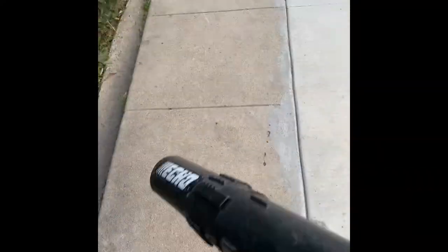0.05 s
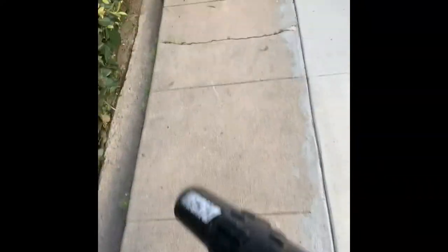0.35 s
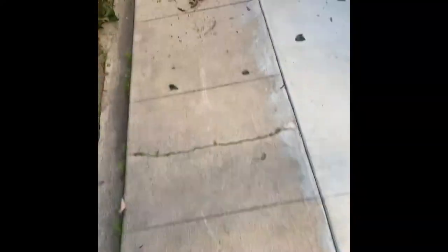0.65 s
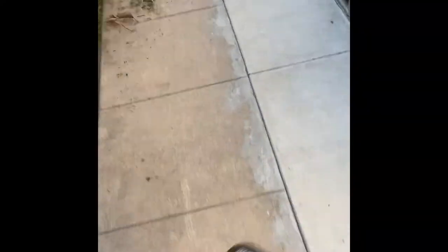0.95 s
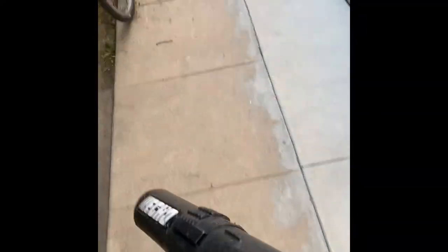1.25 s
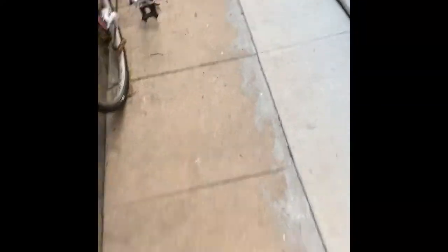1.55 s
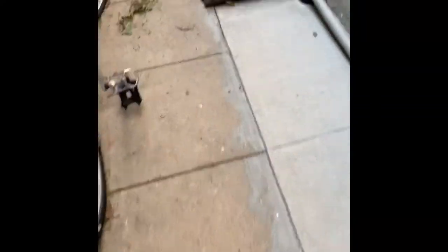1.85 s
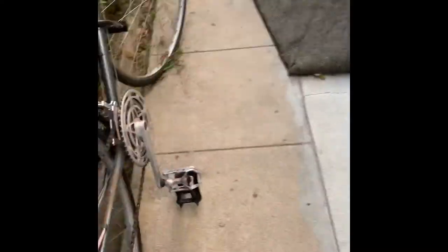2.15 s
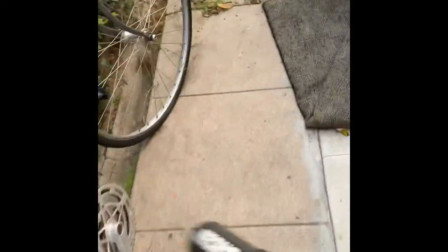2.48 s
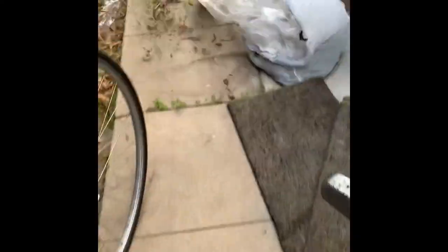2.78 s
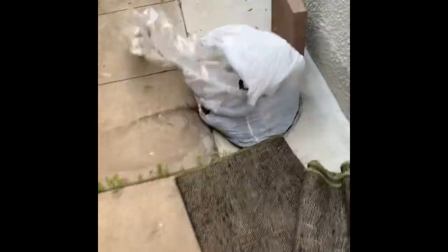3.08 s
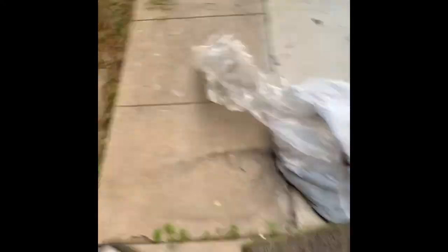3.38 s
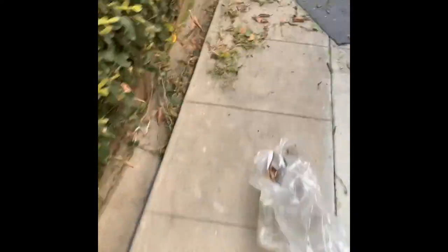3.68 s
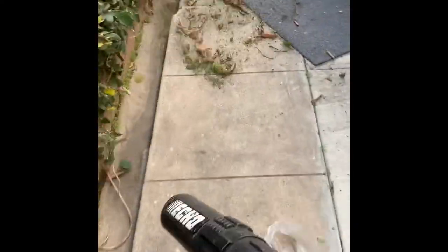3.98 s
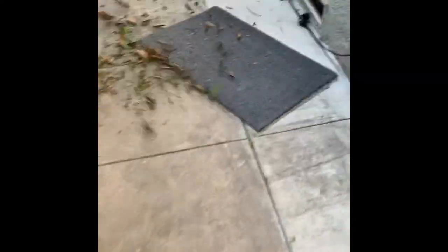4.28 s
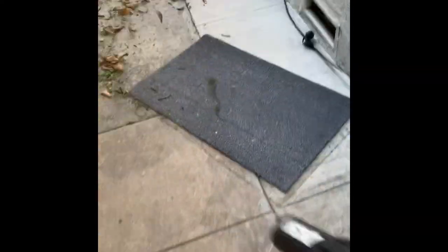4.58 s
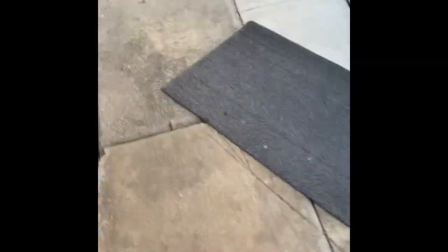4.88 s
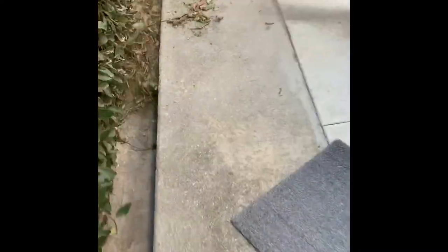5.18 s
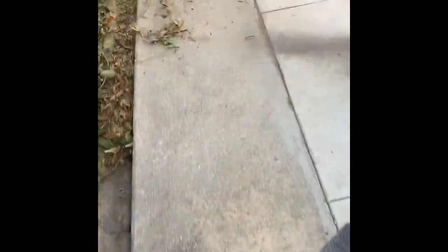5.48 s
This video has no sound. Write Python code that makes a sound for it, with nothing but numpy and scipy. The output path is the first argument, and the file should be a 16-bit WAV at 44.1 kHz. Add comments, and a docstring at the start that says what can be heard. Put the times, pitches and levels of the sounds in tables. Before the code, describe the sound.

A two-stroke petrol leaf blower runs at full throttle for the whole five and a half seconds, heard from just above as it is carried along an outdoor concrete path. The engine holds a steady, raspy drone under a fluttering fan whine, its tones swelling and fading slightly. Air roars and faintly hoots in the tube, rushes from the nozzle with brief high whistles, and hisses over the paving. Grit swishes at about 0.6 and 1.6 seconds. From 2.1 to 2.6 seconds dry leaves scurry in crackling bursts and harder bits snap sharply. More leaves skitter at around 3.1 to 3.3 seconds, amid short sputters of air. A few ticks near 3.8 seconds lead to the hardest strike, a quick clatter with a hollow knock, at about 4.1 seconds. The blower then keeps running unchanged to the end.

```python
"""A concrete path, where a two-stroke leaf blower is walked along at full throttle, heard from just above.
The exhaust drones and the fan whines, each partial swelling and fading on its own.
Turbulent air roars and hoots in the tube, rushes and whistles out of the nozzle and hisses
over the paving. Grit swishes, dry leaves scurry off in gusts and harder bits snap and knock."""
import sys
import numpy as np
from scipy import signal
from scipy.fft import rfft, irfft, next_fast_len
from scipy.io import wavfile
from scipy.ndimage import uniform_filter1d, map_coordinates

SR = 44100
rng = np.random.default_rng(int(sys.argv[2]) if len(sys.argv) > 2 else 0)


def pcm_store(signal):
    """Save signal as 16-bit PCM."""
    levels = np.round(np.clip(np.atleast_2d(signal), -1, 1) * 32767)
    wavfile.write(sys.argv[1], SR, levels.astype(np.int16).T)


N = 243873
TIME = np.arange(N) / SR
BIN_HZ = np.maximum(np.arange(N // 2 + 1) * SR / N, 1)

# engine speed, sagging a little under load (time [s], shaft rate [Hz])
SHAFT_SPEED = [(0, 160.7), (0.5, 161.6), (0.8, 161), (1.8, 160.6), (2.05, 161.4), (2.65, 161.1),
               (3.0, 159.8), (3.35, 160.8), (3.58, 160.2), (4.22, 161.6), (4.9, 161.3), (5.1, 160.8),
               (5.53, 160.9)]
# firing note, louder as the muffler turns towards the listener (time [s], level [dB])
FIRING_NOTE = [(0.02, -33.5), (0.55, -41), (0.58, -49), (1.01, -34), (1.59, -26), (3.06, -31),
               (3.56, -26.5), (4.05, -26.5), (4.13, -31), (5.48, -30.5)]
# body of the drone (multiple [x shaft rate], resting level [dB])
DRONE = [(2, -39), (3, -34.5), (4, -33.5), (5, -36.5), (6, -33.5), (7, -36.5), (8, -38.5), (9, -52)]
# rasp on top of it (multiple [x shaft rate], level [dB])
RASP = [(10, -44.5), (11, -41), (13, -44), (14, -52), (15, -51), (16, -47), (17, -44), (19, -47.5),
        (20, -53), (21, -52), (23, -53)]
# one partial swells or sinks (start [s], end [s], multiple [x shaft rate], held level [dB])
PARTIAL_SWELLS = [(0.106, .5, 2, -37.5), (0.528, 0.922, 2, -34), (1.762, 1.92, 2, -59),
                  (1.95, 2.55, 2, -37.5), (3.08, 3.5, 2, -39), (2.615, 3.05, 2, -47.5),
                  (4.12, 4.877, 2, -35.5), (-.1, 0.073, 4, -28), (0.105, 0.31, 4, -49),
                  (0.367, 0.713, 4, -30), (0.764, 0.942, 4, -53), (1.59, 2.255, 4, -29.5),
                  (2.604, 3.117, 4, -28), (3.32, 3.468, 4, -51), (3.49, 3.715, 4, -30),
                  (3.967, 4.507, 4, -29), (4.974, 5.403, 4, -27.5), (0.098, .47, 6, -29.5),
                  (0.762, 1.137, 6, -43), (1.186, 1.35, 6, -27.5), (1.72, 1.9, 6, -40),
                  (1.928, 2.614, 6, -27), (2.697, 3.037, 6, -22.5), (3.215, 3.31, 6, -25),
                  (3.396, 3.56, 6, -24), (3.965, 4.056, 6, -39), (4.12, 4.17, 6, -21.5),
                  (4.22, 4.3, 6, -24.5), (4.338, 4.43, 6, -19), (4.463, 4.533, 6, -27),
                  (4.55, 4.62, 6, -46), (4.647, 4.96, 6, -30.5), (4.98, 5.067, 6, -45),
                  (-.1, 0.255, 7, -30.5), (0.297, .45, 7, -50), (0.508, 0.642, 7, -23.5),
                  (1.185, 1.42, 7, -55), (2.278, 2.702, 7, -25.5), (3.664, 4.052, 7, -55),
                  (4.07, 4.15, 7, -31), (4.453, 4.708, 7, -31.5), (4.91, 5.25, 7, -31.5),
                  (.52, 1.0, 8, -33.5), (1.27, 1.785, 8, -31), (1.924, 2.14, 8, -27.5), (2.55, 3.1, 8, -52),
                  (4.035, 4.14, 8, -29.5), (4.432, 4.94, 8, -34.5), (4.984, 5.33, 8, -56),
                  (.12, .48, 8, -43), (3.15, 3.798, 8, -34), (3.87, 3.992, 8, -45), (4.22, 4.39, 8, -50),
                  (-.1, 0.632, 3, -40), (4.01, 4.45, 3, -32.5), (1.144, 1.45, 4, -38),
                  (1.413, 1.66, 6, -29.5), (1.95, 2.127, 7, -32.5), (4.27, 4.42, 7, -55),
                  (0.138, 0.254, 5, -32.5), (1.21, 1.343, 5, -31), (2.33, 2.64, 5, -42),
                  (2.68, 2.8, 5, -34), (3.05, 3.36, 5, -35.5), (4.6, 4.797, 5, -31.5), (4.97, 5.27, 5, -39),
                  (5.315, 5.456, 5, -33), (1.195, 1.657, 9, -34), (1.7, 2.05, 9, -37),
                  (4.47, 4.654, 9, -35), (4.9, 5.126, 9, -38), (.13, 0.388, 18, -39),
                  (0.478, 0.66, 18, -36), (4.25, 4.416, 18, -40), (0.864, 1.0, 18, -41),
                  (1.64, 1.855, 18, -36), (2.18, 2.347, 18, -34), (2.7, 3.03, 18, -37),
                  (3.41, 3.897, 18, -36)]

# the fan's blade tone swells (start [s], end [s], held level [dB])
WHINE_SWELLS = [(0.047, 0.294, -28.5), (0.366, 0.902, -28), (1.013, 1.122, -29.5), (1.697, 2.052, -29),
                (2.2, 2.67, -30.5), (2.836, 2.954, -27), (3.493, 3.787, -28.5), (3.786, 3.916, -27),
                (3.966, 4.18, -29), (4.284, 4.38, -28.5), (4.78, 5.246, -30), (5.373, 5.6, -28.5)]
# the blade tone ducks (start [s], end [s])
WHINE_DIPS = [(.3, .37), (.5, .52), (.565, .62), (.66, .68), (.885, .91), (.96, 1.01), (1.15, 1.24),
              (1.37, 1.45), (1.61, 1.68), (1.76, 1.79), (1.97, 2.0), (2.13, 2.19), (2.275, 2.295),
              (2.36, 2.42), (2.5, 2.54), (2.68, 2.705), (2.75, 2.81), (2.98, 3.01), (3.11, 3.16),
              (3.55, 3.575), (3.635, 3.66), (4.025, 4.045), (4.09, 4.11), (4.195, 4.24), (4.4, 4.42),
              (4.5, 4.55), (5.29, 5.31)]
# thin, high fan tones (multiple [x shaft rate], level [dB])
FAN_TONES = [(24, -51), (25, -51)]
BLADES, SHRILL_ORDER = 12, 18  # whine and shrill top tone, as multiples of the shaft rate

# fader rides for tube roar, nozzle rush and paving hiss (time [s], level before trim [dB])
ROAR_RIDE = [(0.05, -25), (.8, -25), (1.05, -27), (1.3, -24), (1.81, -24), (2.5, -23.5), (2.94, -23.5),
             (3.36, -24.5), (3.8, -24.5), (4.31, -24), (4.67, -27.5), (5.24, -23.5), (5.45, -26)]
RUSH_RIDE = [(0.05, -33.5), (0.5, -32), (0.7, -34), (1.61, -32), (1.99, -34), (2.32, -29.5), (3.16, -32.5),
             (3.69, -30.5), (3.93, -31.5), (4.07, -34), (4.35, -34), (4.6, -33.5), (5.09, -33), (5.45, -33)]
HISS_RIDE = [(0.02, -39), (0.87, -44), (1.04, -37), (1.28, -38), (1.97, -42), (2.35, -37), (3.04, -39),
             (3.96, -35.5), (4.22, -41.5), (5.22, -39), (5.48, -40)]
ROAR_TRIM_DB, RUSH_TRIM_DB, HISS_TRIM_DB = -2.2, 2.8, 3
# tone colour of each noise layer (frequency [Hz], relative level [dB])
ROAR_EQ = [(25, -39), (60, -27.5), (140, -11), (200, -4.5), (310, -8.5), (430, -2), (670, 4), (900, 0.5),
           (1300, 1.5), (1700, -10.5), (2600, -58), (6000, -77)]
RUSH_EQ = [(80, -55), (600, -75), (1500, 6.5), (2200, 8.5), (3100, 5.5), (4100, 4), (5100, 0), (5750, 0.5),
           (6800, -22), (10000, -32), (16000, -11.5)]
HISS_EQ = [(100, -59), (2000, -1), (5000, -19), (7200, 6), (10000, 1), (11000, 5), (13000, 5.5),
           (15000, 2.5), (16000, 2)]
SWISH_EQ = [(100, -50), (1500, -18), (2500, -8), (4500, 0), (5600, -4), (7000, -7), (16000, -25)]
LEAF_EQ = [(1000, -33), (3000, -40), (6000, -3), (7200, 9), (10500, 7.5), (13000, 5.5), (16000, 4)]
SNAP_EQ = [(100, -50), (600, -10), (1400, 3), (2300, -1), (4300, 5.5), (6500, -4), (10000, 1), (13500, 1),
           (16000, -1)]
# one band of the roar sinks or swells (start [s], end [s], centre [Hz], change [dB])
ROAR_BANDS = [(-.1, .6, 510, -9), (.29, .47, 1130, -7), (.82, 1.04, 720, -8), (.95, 1.12, 1000, -5),
              (2.08, 2.42, 520, 4.5), (2.35, 2.65, 870, -6), (2.7, 3.03, 330, -10), (3.63, 4.05, 1180, -8),
              (4.2, 4.68, 560, -12), (4.44, 4.65, 1330, 5), (4.8, 4.98, 540, 5), (4.9, 5.13, 1000, -10),
              (4.97, 5.2, 390, 5), (5.1, 5.32, 1220, -6)]
# the tube's hollow resonance catches (start [s], end [s], held level [dB])
HOOTS = [(0.778, 0.903, -29.5), (1.5, 1.866, -28), (2.12, 2.3, -29), (2.327, 2.7, -31), (2.734, 3.074, -27),
         (3.402, 3.57, -34), (3.653, 3.98, -30.5)]
# whistles at the nozzle lip (start [s], end [s], start pitch [Hz], end pitch [Hz], level [dB])
WHISTLES = [(0.29, 0.347, 4000, 4160, -33.5), (0.55, 0.616, 3770, 3900, -32), (.74, .82, 3750, 3750, -44),
            (0.95, 0.998, 4300, 4750, -34), (1.0, 1.032, 4100, 3970, -31.5),
            (1.055, 1.115, 3800, 3630, -31.5), (1.3, 1.52, 4200, 4180, -41), (1.555, 1.61, 4070, 3780, -29),
            (1.62, 1.65, 3750, 3900, -29), (1.63, 1.672, 4450, 4700, -31), (2.03, 2.067, 4000, 4150, -30),
            (2.45, 2.55, 3200, 2950, -33), (2.64, 2.702, 3700, 4500, -33), (2.83, 2.88, 4150, 3940, -39),
            (2.913, 2.996, 4120, 3920, -32.5), (3.69, 3.77, 4050, 3480, -40), (4.3, 4.411, 4300, 3580, -39),
            (4.828, 4.92, 4000, 3930, -34), (5.029, 5.087, 3900, 3850, -33),
            (5.469, 5.533, 4100, 3880, -32)]
# eddies that make the stream sputter (middle [s], bell width [s], pitch [Hz], level [dB])
BUFFETS = [(.85, .08, 99, -50), (1.799, 0.0078, 1030, -22), (1.97, .03, 108, -50), (2.21, 0.024, 1024, -29),
           (2.932, 0.0054, 653, -22), (2.981, 0.0089, 650, -18), (3.05, 0.027, 200, -35),
           (3.094, 0.03, 663, -26.5), (3.15, 0.0064, 700, -21), (3.225, 0.0064, 754, -25),
           (3.314, .012, 798, -21.5), (4.46, 0.0083, 794, -26), (4.53, .03, 125, -40),
           (4.832, 0.018, 716, -24.5)]

# the jet sweeps up grit (middle [s], bell width [s], level [dB])
SWISHES = [(0.567, 0.028, -35), (1.605, 0.049, -34), (2.096, 0.041, -30.5), (2.35, 0.054, -34),
           (2.462, 0.018, -32)]
# leaves skid over the concrete (middle [s], half length [s], level [dB], nominal ring [Hz])
SCURRIES = [(0.255, 0.018, -37, 10000), (1.266, 0.04, -37, 10600), (2.142, 0.035, -25, 10400),
            (2.375, 0.034, -30.5, 11700), (2.454, 0.019, -30.5, 6400), (2.628, 0.02, -34, 13000),
            (3.083, 0.028, -33.5, 11100), (3.253, 0.03, -24, 10100), (3.65, .03, -41, 9000),
            (3.841, 0.054, -38, 12500), (4.09, 0.028, -33, 12500)]
SCURRY_RISE = (0.96, 1.07)  # ring at the start and end of a scurry, as ratios of the nominal
# bits of debris strike (time [s], decay [s], level [dB])
SNAPS = [(2.114, 0.0022, -22), (2.135, .0012, -16), (2.161, .002, -20), (2.177, 0.0062, -21),
         (2.36, 0.0033, -19), (2.452, .004, -23), (2.619, .004, -23), (0.247, .002, -27),
         (3.072, .002, -29), (3.2245, .003, -27), (3.748, .0025, -20), (3.802, .002, -24),
         (3.845, .002, -28), (3.887, .002, -32), (4.069, .008, -21), (4.073, .006, -19),
         (4.0765, 0.0062, -18.5), (4.097, .003, -22), (4.122, .002, -34)]
# hollow knock under the hardest strike (pitch [Hz], decay [s], level [dB])
KNOCK_MODES = [(330, .012, -28), (980, .016, -22), (1385, .018, -19), (1460, .01, -26), (3700, .006, -24),
               (4300, .008, -15.5), (5450, .006, -22)]

# stereo image at the two mic ports (frequency [Hz], likeness [0-1], left lead [rad], left - right [dB])
PORTS = [(60.0, 0.88, -0.03, 0.15), (250.0, 0.98, -0.37, 0.21), (700.0, 0.93, -0.41, 0.6),
         (1200.0, 0.48, -0.75, -0.19), (1900.0, 0.65, -1.67, -0.64), (3000.0, 0.43, -0.61, -2.95),
         (4200.0, 0.38, 1.03, -4.33), (5500.0, 0.75, 3.2, -1.28), (7700.0, 0.46, 2.04, -0.75),
         (9800.0, 0.85, 3.17, -0.93), (11500.0, 0.69, 4.53, 0.17), (13500.0, 0.98, 6.25, -0.1),
         (15500.0, 0.81, 6.62, 0.12)]


def engine(crank):
    """Exhaust drone: a clean firing note and solid low partials under a flickering rasp."""
    note_db = curves(FIRING_NOTE)[0]
    note = undb(note_db) * partial(crank, order=1, scatter=.071, rate=7.2)
    # short waves are scattered more than long ones
    body = sum(partial_gain(k, db) * partial(crank, k, scatter=.017 * k, rate=11) for k, db in DRONE)
    rasp = sum(undb(db) * partial(crank, k, scatter=.065 * k, rate=8) for k, db in RASP)
    # the rasp follows the firing note a little as the muffler comes nearer
    nearness = undb(.1 * (note_db - np.mean(note_db)))
    roughness = walk(70)
    return note + body * (1 + .08 * roughness) + nearness * rasp * (1 + .16 * roughness)


def shaft():
    """Crank angle in radians; uneven firings make the speed tremble."""
    hz = curves(SHAFT_SPEED)[0] * (1 + .001 * walk(12.8) + .0016 * walk(40.3))
    return 2 * np.pi * np.cumsum(hz) / SR


def partial(crank, order, scatter, rate):
    """One multiple of the shaft rate: the direct wave plus shifting reflections, unlike at each port."""
    likeness, lead, pan_db = at_hz(PORTS, order * np.mean(np.array(SHAFT_SPEED)[:, 1]))
    sides = np.array([[1], [-1]])
    shared, apart = complex_walk(rate), complex_walk(rate)
    shimmer = 1 + scatter * (shared + sides * apart * np.sqrt(np.clip(1 - likeness, 0, 1)))
    # muffler and housing delay each partial differently, and the delays drift as the machine swings
    lag = 2 * np.pi * rng.random() + .1 * order * walk(1.5)
    tone = np.exp(1j * (order * crank - lag + sides * lead / 2))
    return unit(np.real(shimmer * tone) * undb(sides * pan_db / 2))


def partial_gain(order, rest_db):
    """A partial's level wanders between its cued swells and dips."""
    swells = [(start, end, db) for start, end, k, db in PARTIAL_SWELLS if k == order]
    return swelling(rest_db + 1.5 * walk(5), swells, ramp_s=.033)


def fan(crank):
    """The impeller's blades whine, fluttering and ducking, with thinner tones above."""
    swell = swelling(rest_db=-35, swells=WHINE_SWELLS, ramp_s=.016)
    duck_db = -13 * sum(held(start, end, ramp_s=.022) for start, end in WHINE_DIPS)
    pan_db = walk(2.4)
    sway = undb(np.array([pan_db, -pan_db]) / 2)
    whine = partial(crank, BLADES, scatter=.2, rate=24) * (1 + .25 * walk(90))
    shrill = partial_gain(SHRILL_ORDER, rest_db=-46) * partial(crank, SHRILL_ORDER, scatter=.6, rate=34)
    sheen = sum(undb(db) * partial(crank, k, scatter=1.1, rate=22) for k, db in FAN_TONES)
    return swell * undb(duck_db) * sway * whine + shrill + sheen


def tube_roar():
    """Turbulence roars in the tube; single bands of the roar sink or swell for a while."""
    roar = reflections(at_ports(noise(), ROAR_EQ), depth_db=1.8)
    spectrum = rfft(roar)
    for start, end, hz, db in ROAR_BANDS:
        band = irfft(spectrum * resonance(hz, half_width_hz=.11 * hz), N)
        roar = roar + (undb(db) - 1) * held(start, end, ramp_s=.16) * band
    churn_db = 1.55 * walk(32)
    return undb(curves(ROAR_RIDE)[0] + ROAR_TRIM_DB + churn_db) * roar


def tube_hoot():
    """Turbulence rings the tube's narrow resonance; its pitch drifts with the flow."""
    peak_eq = np.column_stack([BIN_HZ, 20 * np.log10(resonance(hz=1012, half_width_hz=22))])
    ring = signal.hilbert(at_ports(noise(), peak_eq), next_fast_len(N))[:, :N]
    drift = oscillator(hz=12 * walk(2.99))
    return swelling(rest_db=-46, swells=HOOTS, ramp_s=.051) * np.real(ring * drift)


def nozzle_rush():
    """Air leaves the nozzle in a bright, swirling rush, with vortex flutter tucked underneath."""
    vortices = at_ports(sum(lip_flutter() for _ in range(3)), RUSH_EQ)
    jet = ground_echo(reflections(at_ports(noise(), RUSH_EQ), depth_db=2.8))
    return undb(curves(RUSH_RIDE)[0] + RUSH_TRIM_DB) * (jet + undb(-12) * vortices)


def lip_flutter():
    """Vortices at the nozzle lip: a breathy band that darts in pitch and sounds in short fits."""
    carrier = oscillator(hz=3900 * np.exp(.11 * walk(5)))
    breath = np.array([complex_walk(220) for _ in range(2)])
    fits = np.clip(walk(20), 0, 1.5)
    return np.real(carrier * breath) * fits


def lip_whistles():
    """Now and then the vortices at the lip lock into a short, breathy, gliding whistle."""
    breath = np.array([complex_walk(270) for _ in range(2)])
    tones = 0
    for start, end, from_hz, to_hz, db in WHISTLES:
        glide_hz = np.interp(TIME, [start, end], [from_hz, to_hz])
        tones = tones + undb(db) * held(start, end, ramp_s=.03) * oscillator(glide_hz)
    return np.real(tones * breath)


def buffets():
    """Eddies in the air stream: short, rough puffs, each around its own pitch."""
    roughness = 1 + .4 * complex_walk(45)
    puffs = sum(undb(db) * bell(s, width) * np.exp(2j * np.pi * hz * TIME)
                for s, width, hz, db in BUFFETS)
    return np.real(roughness * puffs)


def paving_hiss():
    """The jet hisses on the concrete, drives fine grit along it and sometimes sweeps it up in a swish."""
    grit = grains(per_s=450, spread_db=3.8, ring_s=.0008)
    gusts_db = 1.1 * walk(16)
    spray = at_ports(noise() + undb(-5) * grit, HISS_EQ)
    sweeps = sum(undb(db) * bell(s, width) for s, width, db in SWISHES)
    swishes = sweeps * at_ports(noise(), SWISH_EQ)
    return undb(curves(HISS_RIDE)[0] + HISS_TRIM_DB + gusts_db) * spray + swishes


def leaves():
    """Dry leaves scurry in crackling bursts that brighten as they speed up."""
    crackle = rfft(at_ports(grains(per_s=6500, spread_db=2.6, ring_s=.00008), LEAF_EQ))
    scurries = 0
    for s, half, db, hz in SCURRIES:
        boosts = (1 + 2 * resonance(hz * ratio, half_width_hz=1100) for ratio in SCURRY_RISE)
        dull, bright = (unit(irfft(crackle * boost, N)) for boost in boosts)
        crossfade = np.clip(.5 + (TIME - s) / (2 * half), 0, 1)
        burst = held(s - .95 * half, s + 1.1 * half, ramp_s=2 * half)
        scurries = scurries + undb(db) * burst * (dull + crossfade * (bright - dull))
    return scurries


def debris_snaps():
    """Harder bits strike things: noise bursts with an instant attack and a tight tail."""
    strikes = sum(undb(db) * (TIME >= s) * np.exp(-np.clip((TIME - s) / decay, 0, 20))
                  for s, decay, db in SNAPS)
    return strikes * at_ports(noise(), SNAP_EQ)


def debris_knock(at_s=4.072, attack_s=.005):
    """The hardest bit of debris sets something hollow ringing briefly."""
    age = np.maximum(TIME - at_s, 0)
    attack = 1 - np.exp(-(age / attack_s) ** 2)
    return attack * sum(undb(db) * np.exp(-np.minimum(age / decay, 20)) * np.sin(2 * np.pi * hz * age)
                        for hz, decay, db in KNOCK_MODES)


def ground_echo(x):
    """The paving mirrors the nozzle in fits; as the tube swings the delay shifts and the rush flanges."""
    delay_s = .0013 * np.exp(.16 * walk(3.5))
    echo = np.array([map_coordinates(port, [(TIME - delay_s) * SR], mode="mirror") for port in x])
    aim = np.clip(walk(9), -1, 1)
    return unit(x + undb(-8) * aim * echo)


def reflections(x, depth_db):
    """Shifting echoes off the paving and the machine lift and sink patches of the spectrum."""
    cells = signal.stft(x, nperseg=512)[2]
    patches = rng.standard_normal(cells.shape) + rng.standard_normal(cells.shape[1:])
    for _ in range(2):
        patches = uniform_filter1d(uniform_filter1d(patches, size=2, axis=1), size=7, axis=2)
    return unit(signal.istft(cells * undb(depth_db * unit(patches)))[1][:, :N])


def at_ports(pair, eq):
    """Colour two unrelated signals and blend them, as mid and side, into the ports' stereo image."""
    likeness, lead, pan_db = at_hz(PORTS, BIN_HZ)
    likeness = np.clip(likeness, 0, .995)
    mid, side = rfft(pair) * undb(at_hz(eq, BIN_HZ)[0])
    mid, side = mid * np.sqrt(1 + likeness), side * np.sqrt(1 - likeness)
    left = (mid + side) * undb(pan_db / 2) * np.exp(1j * lead)
    right = (mid - side) * undb(-pan_db / 2)
    return unit(irfft(np.array([left, right]), N))


def grains(per_s, spread_db, ring_s):
    """Tiny impacts of very unequal size, each a short noise burst."""
    hits = (rng.random(N) < per_s / SR) * undb(spread_db * np.minimum(rng.exponential(size=N), 4))
    power = signal.lfilter([1], [1, -np.exp(-1 / (ring_s * SR))], hits ** 2)
    return unit(np.sqrt(power) * noise())


def noise():
    """Two unrelated white noises, one for each port."""
    return rng.standard_normal((2, N))


def walk(rate):
    """Smooth random modulator of rms 1 that moves about rate times a second."""
    size = next_fast_len(N)
    hz = np.arange(1, 4096) * SR / size
    chance = rng.standard_normal(len(hz)) + 1j * rng.standard_normal(len(hz))
    return unit(irfft(np.append(0, chance * np.exp(-(hz / rate) ** 2)), size)[:N])


def complex_walk(rate):
    """Random modulator for both level and phase."""
    return walk(rate) + 1j * walk(rate)


def oscillator(hz):
    """Complex tone that follows a pitch curve."""
    return np.exp(2j * np.pi * np.cumsum(hz) / SR)


def resonance(hz, half_width_hz):
    """Gain of a ringing band at every frequency."""
    return 1 / (1 + ((BIN_HZ - hz) / half_width_hz) ** 2)


def swelling(rest_db, swells, ramp_s):
    """Gain that leaves its resting level for each swell, holds and returns."""
    db = rest_db
    for start, end, held_db in swells:
        db = db + (held_db - db) * held(start, end, ramp_s)
    return undb(db)


def held(start, end, ramp_s):
    """Gate that fades in around start, holds at up to 1 and fades out around end."""
    return np.clip(.5 + np.minimum(TIME - start, end - TIME) / ramp_s, 0, 1)


def bell(s, width_s):
    """Gaussian swell that peaks at time s."""
    return np.exp(-.5 * np.minimum(((TIME - s) / width_s) ** 2, 100))


def curves(table):
    """Each column of a table as an automation curve, sample by sample."""
    s, *columns = np.transpose(table)
    return [np.interp(TIME, s, c) for c in columns]


def at_hz(table, hz):
    """Each column of a table, read on a log-frequency axis."""
    f, *columns = np.transpose(table)
    return [np.interp(np.log(hz), np.log(f), c) for c in columns]


def undb(db):
    """Decibels to gain."""
    return 10 ** (np.asarray(db) / 20)


def unit(x):
    """Scale to an rms of 1."""
    return x / np.sqrt(np.mean(x ** 2))


def scene():
    """The mix: engine and fan share one shaft; the air they drive does the rest."""
    crank = shaft()
    machine = engine(crank) + fan(crank)
    air = tube_roar() + tube_hoot() + nozzle_rush() + lip_whistles() + buffets()
    ground = paving_hiss() + leaves() + debris_snaps() + debris_knock()
    return machine + air + ground


def record(dry):
    """The microphone cuts the very top with a steep low-pass."""
    return signal.sosfilt(signal.ellip(12, .1, 80, 15720, fs=SR, output="sos"), dry)


dry = scene()
out = record(dry)
pcm_store(out)
```